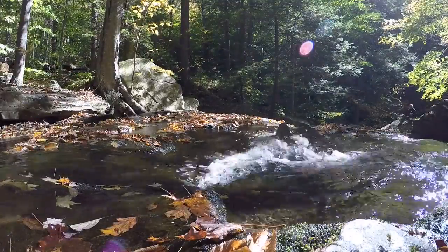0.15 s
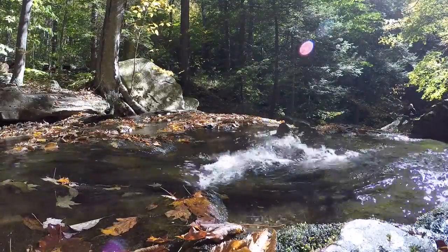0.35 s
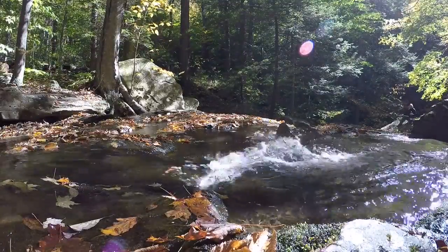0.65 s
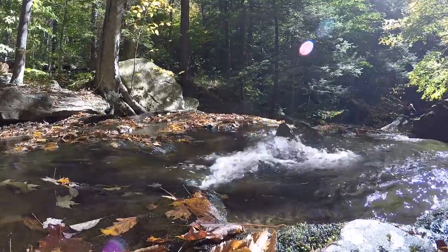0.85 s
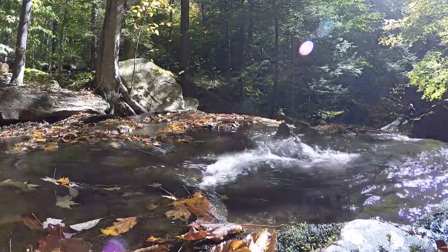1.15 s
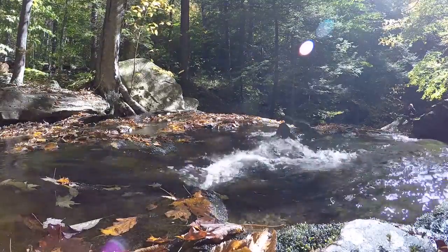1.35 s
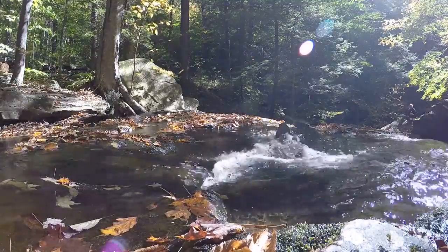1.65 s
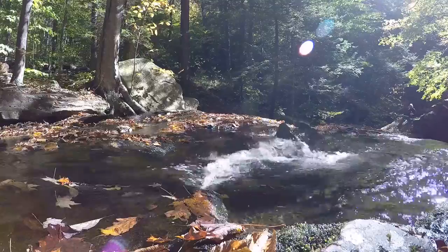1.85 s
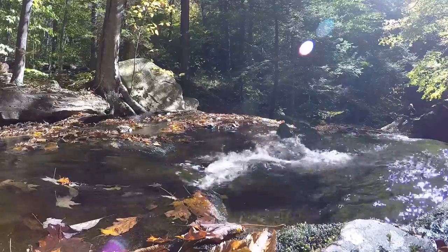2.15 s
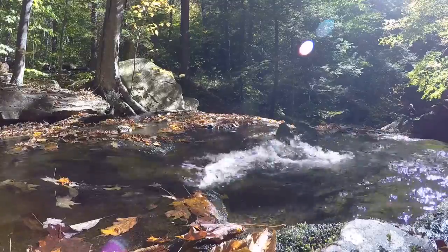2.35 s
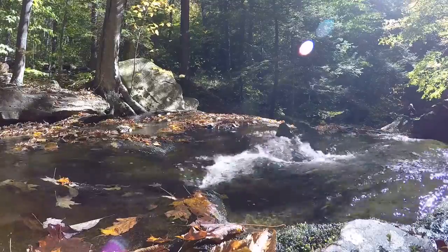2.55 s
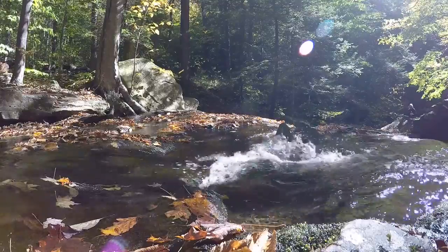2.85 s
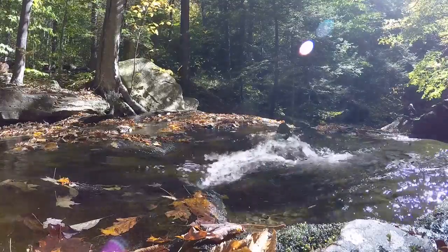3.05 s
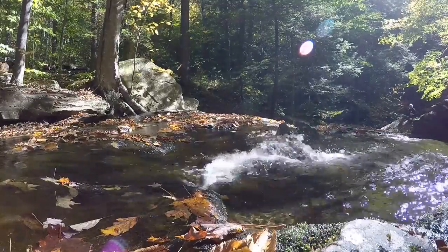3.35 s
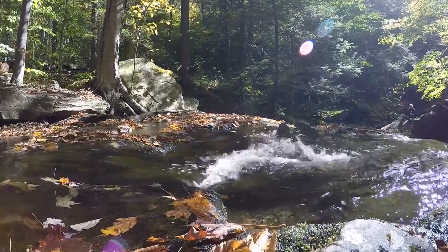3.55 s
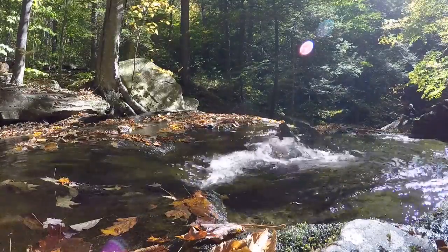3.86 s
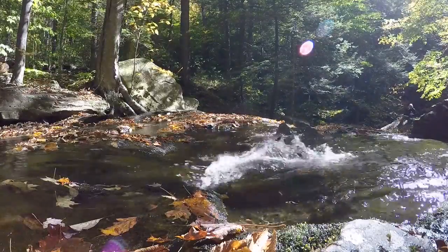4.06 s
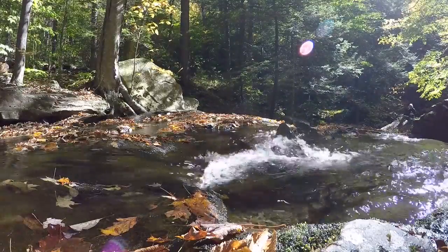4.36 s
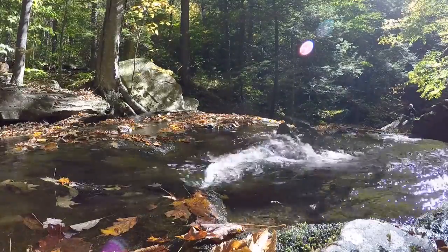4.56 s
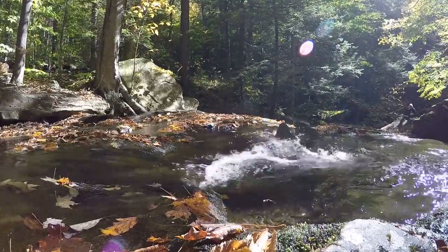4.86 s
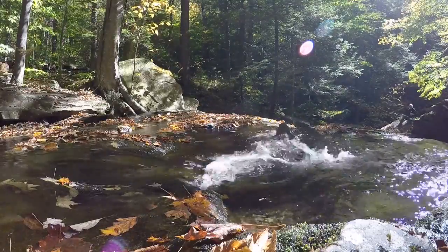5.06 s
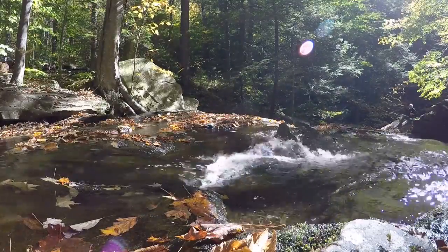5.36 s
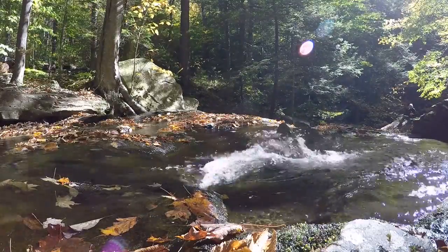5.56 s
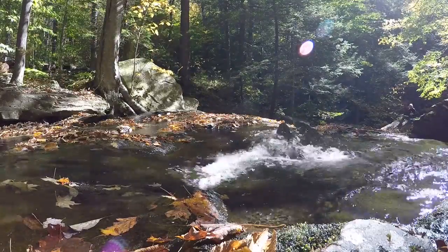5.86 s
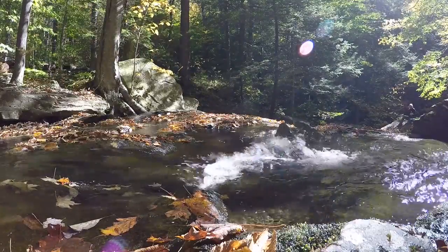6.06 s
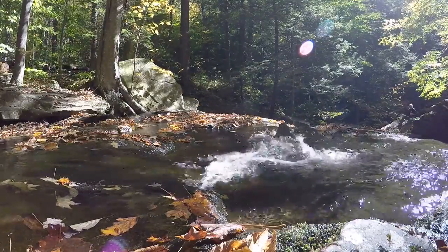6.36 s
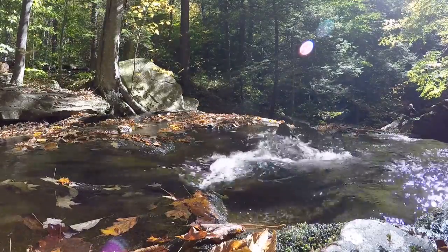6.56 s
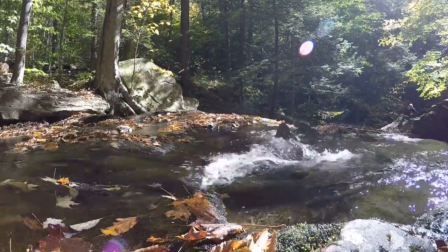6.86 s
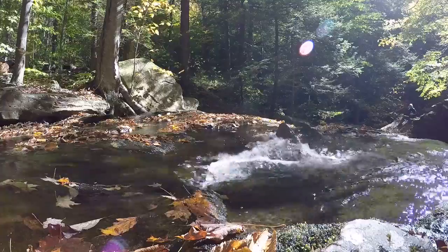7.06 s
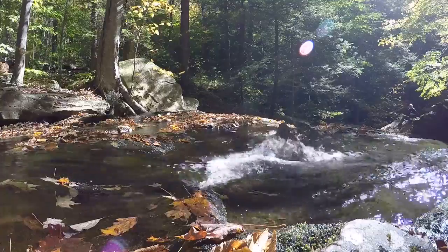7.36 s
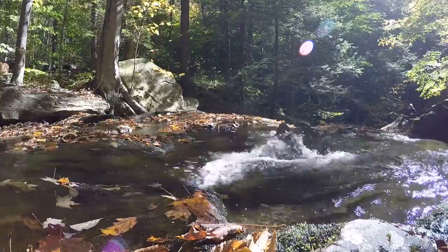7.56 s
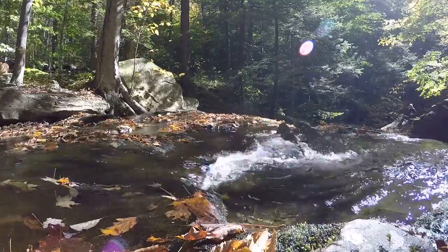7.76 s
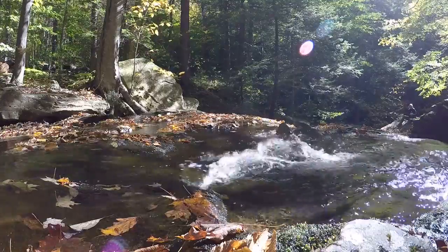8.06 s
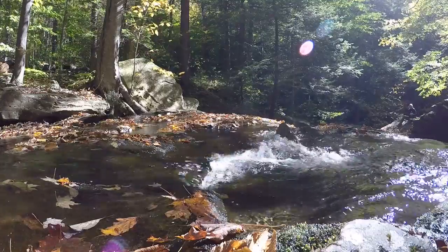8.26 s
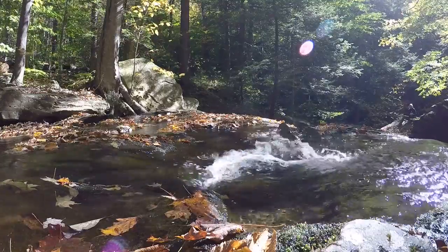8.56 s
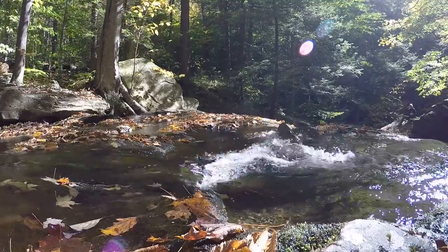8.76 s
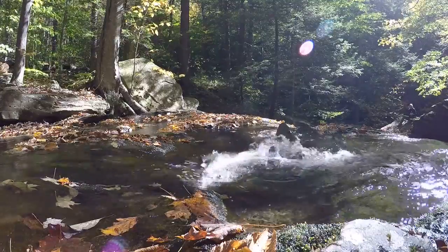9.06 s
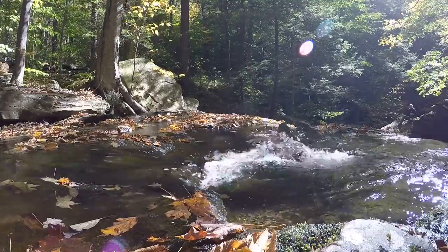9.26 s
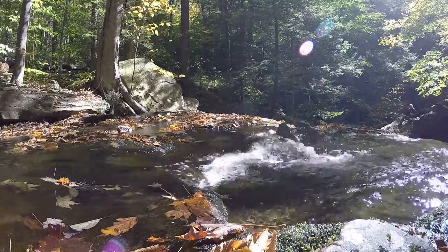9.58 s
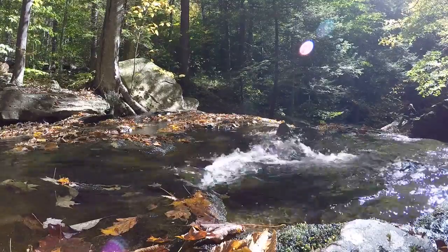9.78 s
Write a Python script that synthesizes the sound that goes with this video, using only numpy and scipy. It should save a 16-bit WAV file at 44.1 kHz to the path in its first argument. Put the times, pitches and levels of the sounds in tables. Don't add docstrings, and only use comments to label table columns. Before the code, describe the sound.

A small forest stream rushes steadily over rocks, hissing white water filled with bubbling gurgles, bright plips and sharp droplet clicks close by.

```python
import sys
import numpy as np
from scipy import signal
from scipy.io import wavfile
from scipy.ndimage import uniform_filter1d

SR = 44100
rng = np.random.default_rng(int(sys.argv[2]) if len(sys.argv) > 2 else 0)


def gain_from_decibels(decibels):
    exponent = np.asarray(decibels, float) / 20
    return 10 ** exponent


def bounce(signal):
    frames = np.transpose(np.atleast_2d(signal))
    limited = np.clip(frames, -1, 1)
    pcm = np.round(limited * 32767).astype(np.int16)
    wavfile.write(sys.argv[1], SR, pcm)


N = 437472

# [t/s, level/dB]
WATER_FLOW = [(0, -44), (.65, -45), (1.2, -44.2), (3.5, -45), (4.2, -45), (4.7, -44), (5.1, -45),
              (6.5, -44.3), (7.68, -44), (7.84, -46.5), (8.0, -43.5), (8.2, -44.5), (9.12, -44.5),
              (9.28, -43.5), (9.92, -45.5)]
# [f/Hz, level/dB]
BUBBLE_SHARE = [(200, -5), (700, 0), (1500, -5), (3000, -3.5), (6000, -3.5), (13000, -8)]
# [f/Hz, level/dB]
CASE_COLOUR = [(80, -11), (190, -15.5), (300, -14.5), (650, -19), (1000, -15), (1500, -7), (3000, -7),
               (4300, -11), (6000, -20.5), (10500, -31), (15500, -36.5)]
# [f/Hz, width/Hz, level/dB]
CASE_PEAKS = [(1120, 136, 2.5), (1238, 110.0, -5), (1780.0, 348, 6.5), (2180, 100.0, -1.2), (2533, 300, 4),
              (3396, 176, 4.5), (3500, 78, -1.5), (3780.0, 215, 5), (4440, 210, -6), (4694, 310, -5),
              (5340, 450, 2.5), (5980, 170, -3), (6160, 230, 1.5), (6580, 220.0, -2.9), (7000, 190, 2),
              (8010.0, 330, 3.5), (9450, 1100, 2.0), (13310.0, 460.0, 2.5), (13700, 930, 2.5)]
# [t/s, peak level/dB, pitch
# f/Hz, length/cycles]
CLEAR_BUBBLES = [(.3563, -35, 2260, 9.3), (1.203, -36, 3830, 11), (1.2754, -32, 3270, 8.9),
                 (1.3853, -32, 3010, 4.4), (1.529, -33.5, 1890, 4.2), (1.8676, -36, 4890, 8.3),
                 (2.1123, -32, 3480, 5.4), (2.2933, -27, 3780, 4.9), (2.5119, -28, 3700, 4.4),
                 (2.7527, -33.5, 1790, 5.9), (2.9142, -28, 3490, 4.8), (4.0693, -34, 3700, 8.8),
                 (5.0011, -33, 2460, 6), (5.3191, -34, 4800, 7), (5.4623, -29, 1850, 6.5),
                 (5.8218, -31, 2620, 5), (6.427, -32, 3540, 5.2), (6.4874, -25.5, 2510, 8),
                 (8.8094, -28.5, 3700, 3.4), (7.0967, -32, 1800, 6.5), (7.189, -34, 1880, 4.1),
                 (7.5772, -28, 2670, 11.2), (7.6587, -31, 3870, 5.6), (7.6798, -34, 3490, 6.8),
                 (7.6951, -34, 1980, 8), (8.0873, -34, 2810, 5.9), (8.4563, -26.5, 3100, 3.2),
                 (8.5143, -32, 2180, 4.5), (8.8254, -36, 4260, 16.3), (9.3422, -31, 3150, 4.2)]
# [t/s, peak level/dB, pitch f/Hz]
TINY_BUBBLES = [(1.0074, -51, 9850), (1.2242, -43, 7050), (1.3267, -48, 6090), (1.5756, -42, 5330),
                (1.6039, -49, 7020), (2.3744, -42, 5180), (2.5786, -40, 5430), (2.8546, -44, 4790),
                (3.0364, -49, 8070), (3.229, -50, 8010), (3.906, -44, 7920), (4.1244, -46, 13120),
                (4.7791, -47, 6170), (5.58, -43, 4590), (5.6932, -39, 4970), (6.1932, -49, 7200),
                (6.9119, -52, 12590), (6.9995, -50, 7130), (7.3792, -43, 7840), (7.8259, -42, 4930),
                (7.9476, -49, 12210), (8.4565, -47, 8340), (8.5452, -43, 4830), (8.5692, -43, 7180),
                (8.81, -49, 7410), (9.1117, -49, 8450), (9.1467, -51, 13750), (9.1908, -47, 5940),
                (9.256, -43, 6630), (9.8649, -49, 8620)]
# [t/s, peak level/dB, pitch f/Hz]
DULL_PLOPS = [(.0018, -34, 3690), (.5762, -45, 1210), (.807, -39, 1570), (1.0986, -34, 2430),
              (2.8193, -33, 3210), (3.9451, -35, 3030), (4.0795, -35, 3080), (4.3651, -38, 4030),
              (4.66, -37, 1700), (4.728, -37, 1780), (4.797, -33, 1650), (4.812, -33.5, 1700),
              (4.825, -40, 2300), (5.2613, -36, 2640), (5.3986, -32, 1860), (5.513, -36, 2430),
              (5.7462, -36, 1540), (5.7998, -48, 720), (6.1215, -36, 1680), (6.2344, -36, 3650),
              (6.2772, -36, 3890), (6.348, -35, 1760), (6.7405, -37, 3470), (6.889, -36, 2660),
              (7.4727, -37, 3970), (8.692, -43, 1160), (6.4812, -35, 2500), (9.1811, -37, 3060),
              (9.2413, -34, 2290), (9.5382, -41, 2400)]
# [t/s, peak level/dB]
HARD_DROPS = [(1.2216, -24), (1.275, -33), (2.0996, -31), (2.2927, -26), (2.5106, -24), (2.914, -26),
              (3.9054, -34), (4.1234, -38), (5.3185, -29), (5.4615, -28.5), (6.1474, -35), (6.4872, -30),
              (6.5844, -36), (7.3774, -34), (7.5767, -26), (7.6575, -34), (7.8875, -31), (7.9458, -31),
              (8.456, -26), (8.8093, -28), (9.1087, -30), (9.1454, -33), (9.2534, -30), (9.863, -36)]
# [t/s, peak level/dB, f/Hz, time to fall 60 dB/s]
MOUNT_KNOCKS = [
    (6.148, -48.5, 261, .4),
    (6.255, -58, 270, .12),
]
# [f/Hz, resting level/dB]
POOL_HOLLOWS = [
    (31, -70),
    (45, -72),
    (60, -71.5),
]
# [middle t/s, length/s, rise level/dB]
DEEP_HOLLOW_SURGES = [(.65, 0.55, 11), (1.2, .4, 12), (1.62, .3, 12), (2.7, .7, 7), (4.2, .4, 6),
                      (4.7, .4, 6), (7.5, .4, 9), (9.7, .4, 6.5)]
# [middle t/s, length/s, rise level/dB]
MIDDLE_HOLLOW_SURGES = [(.95, .6, 10), (2.68, .85, 13), (3.45, .55, 10.6), (5.05, .6, 8.4), (6.42, .3, 8),
                        (7.72, 0.53, 15.7)]


def evened(x):
    return x / np.sqrt(np.mean(x ** 2) + 1e-20)


def read(points, hz):
    f, value = np.transpose(points)
    return np.interp(np.log(hz + 1), np.log(f + 1), value)


def add(mix, s, sound):
    part = mix[round(s * SR):][:len(sound)]
    part += sound[:len(part)]


def filtered(x, order, hz, kind):
    return signal.sosfiltfilt(signal.butter(order, hz, kind, fs=SR, output="sos"), x)


def rush():
    s, flow_db = np.transpose(WATER_FLOW)
    level_db = np.interp(np.arange(N) / SR, s, flow_db)
    water = evened(through_case(gain_from_decibels(-1.5) * hiss() + bubbling() + splashes()))
    spray = filtered(water, 2, 4500, "high")
    lows = filtered(water, 2, 1100, "low")
    body = water - lows - spray
    spray_db = -44.0 + 0.18 * (level_db - level_db.mean())
    return gain_from_decibels(level_db + 0.45) * body + gain_from_decibels(spray_db) * spray + gain_from_decibels(-44.0) * lows


def hiss(patchy_db=0.84, flicker_db=0.5, surge_db=0.4):
    frames = N // 64 + 5
    a, b, patches, flicker = rng.standard_normal((frames, 129, 4)).T
    patches = evened(uniform_filter1d(uniform_filter1d(patches, 4, 0), 30, 1))
    flicker = evened(uniform_filter1d(uniform_filter1d(flicker, 60, 0), 6, 1))
    surge = evened(uniform_filter1d(rng.standard_normal(frames), 25))
    reach = np.clip(np.fft.rfftfreq(256, 1 / SR) / 1500, 0, 1)[:, None]
    change_db = reach * (patchy_db * patches + flicker_db * flicker + surge_db * surge)
    z = (a + 1j * b) * gain_from_decibels(change_db)
    return evened(signal.istft(z, nperseg=256, noverlap=192)[1][:N])


def bubbling(count=60, per_s=70, spread_db=3.5, clump_db=1.5, cap=2.67):
    clumps = gain_from_decibels(clump_db * evened(uniform_filter1d(rng.standard_normal(N), 500)))
    pitches, out = np.geomspace(200, 15000, count), np.zeros(N)
    for hz in pitches:
        place, size = rng.random((2000, 2)).T
        cycles, glide = rng.uniform(3.9, 14.8), rng.uniform(-0.06, .12)
        many = int(per_s * (hz / 2000) ** .6 * N / SR)
        size_db = spread_db * np.minimum(-np.log(size[:many] + 1e-9), cap)
        bursts = np.bincount((place[:many] * N).astype(int), gain_from_decibels(size_db), N) * clumps
        ring = evened(signal.oaconvolve(bursts, bubble(hz, cycles, glide))[:N])
        out += ring * np.sqrt(hz) * gain_from_decibels(read(BUBBLE_SHARE, hz))
    return out / np.sqrt(pitches.sum() * SR / 2 / 15000)


def bubble(hz, cycles, glide, phase=0):
    u = np.arange(int(4 * cycles / hz * SR)) * hz / SR / cycles
    shape = (1 - np.exp(-u / 0.14)) * np.exp(-u / 0.72)
    turns = cycles * (u + glide * (u ** 2 - u) / 2)
    return shape / shape.max() * np.sin(2 * np.pi * turns + phase)


def splashes(per_s=200, spread_db=2.5, level_db=-11.0, clump_db=3.5):
    showers = gain_from_decibels(clump_db * evened(uniform_filter1d(rng.standard_normal(N), 600)))
    size = gain_from_decibels(spread_db * np.minimum(rng.exponential(1, N), 3.5)) * rng.choice([-1., 1.], N)
    clicks = size * (rng.random(N) < per_s * showers / SR)
    bright = signal.sosfilt(signal.butter(1, 2500, "high", fs=SR, output="sos"), clicks)
    return gain_from_decibels(level_db) * evened(bright)


def case_db(hz):
    bells = sum(db * np.exp(-2 * ((hz - f) / width) ** 2) for f, width, db in CASE_PEAKS)
    return read(CASE_COLOUR, hz) + bells


def through_case(x):
    log_gain = np.log(gain_from_decibels(case_db(abs(np.fft.fftfreq(8192, 1 / SR)))))
    ringing = np.fft.ifft(np.exp(np.conj(signal.hilbert(log_gain)))).real[:4096]
    return signal.oaconvolve(x, ringing)[:N]


def loud_bubbles(over_db=-2.0, rise_share=0.026, tiny_cycles=8.5, plop_cycles=6.9):
    out = np.zeros(N)
    rows = list(CLEAR_BUBBLES)
    rows += [(*row, tiny_cycles) for row in TINY_BUBBLES]
    rows += [(*row, plop_cycles) for row in DULL_PLOPS]
    for s, db, hz, cycles in rows:
        phase = rng.uniform(0, 2 * np.pi)
        add(out, s, gain_from_decibels(db + over_db) * bubble(hz, max(cycles, 2), rise_share, phase))
    return out


def strikes(over_db=16.0, click_hz=3000):
    out = np.zeros(N)
    click = signal.lfilter(*signal.butter(1, click_hz, "high", fs=SR), np.eye(1, 64)[0])
    for s, db in HARD_DROPS:
        add(out, s, gain_from_decibels(db + over_db) * rng.choice([-1, 1]) * click)
    return through_case(out)


def knocks():
    out, t = np.zeros(N), np.arange(SR // 2) / SR
    for s, db, hz, t60 in MOUNT_KNOCKS:
        add(out, s, gain_from_decibels(db - 60 * t / t60) * np.sin(2 * np.pi * hz * t))
    return out


def throb(width_hz=8):
    t, out = np.arange(N) / SR, np.zeros(N)
    r = np.exp(-np.pi * width_hz / SR)
    surge_lists = (DEEP_HOLLOW_SURGES, MIDDLE_HOLLOW_SURGES, [])
    for (hz, rest_db), surges in zip(POOL_HOLLOWS, surge_lists):
        turn = np.exp(2j * np.pi * hz * t)
        slow = signal.lfilter([1], np.convolve([1, -r], [1, -r]), rng.standard_normal(N) / turn)
        steady = slow / abs(evened(abs(slow)) + .1) ** 0.6
        swell_db = sum(db * np.exp(-(2 * (t - s) / length) ** 4) for s, length, db in surges)
        out += gain_from_decibels(rest_db + swell_db) * evened((turn * steady).real)
    return out


def scene():
    return (rush() + loud_bubbles() + strikes() + knocks() + throb())[None]


def band_limit(x):
    return signal.sosfilt(signal.butter(12, 15350, fs=SR, output="sos"), x)


def record(dry):
    cut = signal.sosfilt(signal.butter(2, 14, "high", fs=SR, output="sos"), dry)
    top_limit = signal.firwin(801, 15290, window=("kaiser", 10), fs=SR)
    mix = signal.oaconvolve(cut, top_limit[None], "same")
    return band_limit(mix)


dry = scene()
out = record(dry)
bounce(out)
```